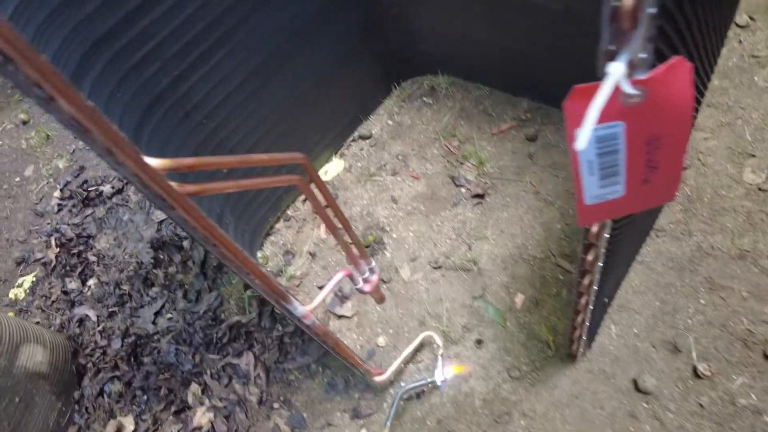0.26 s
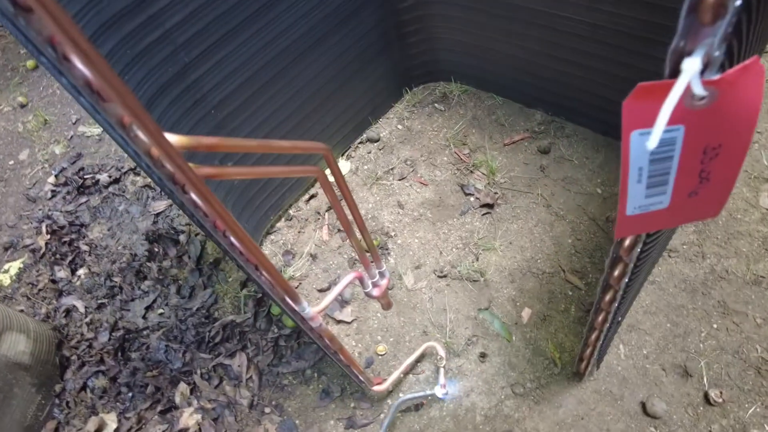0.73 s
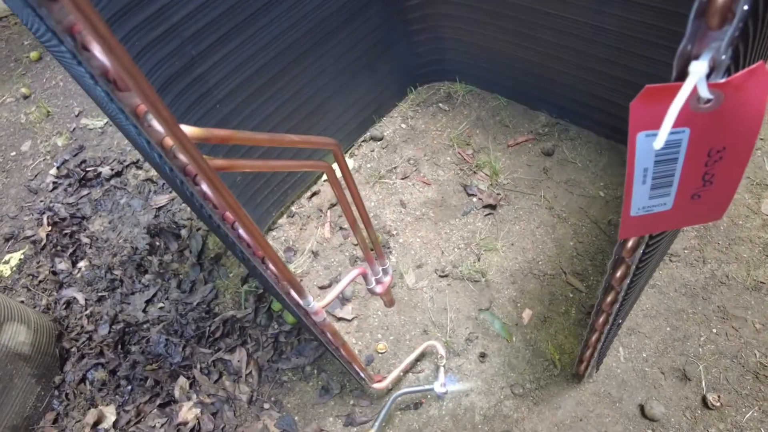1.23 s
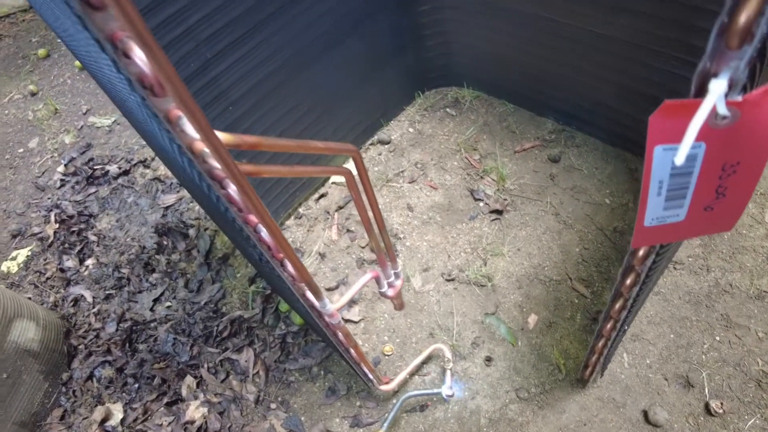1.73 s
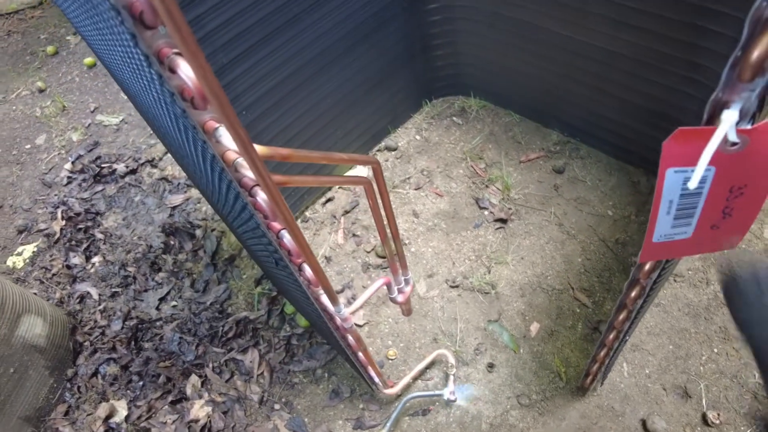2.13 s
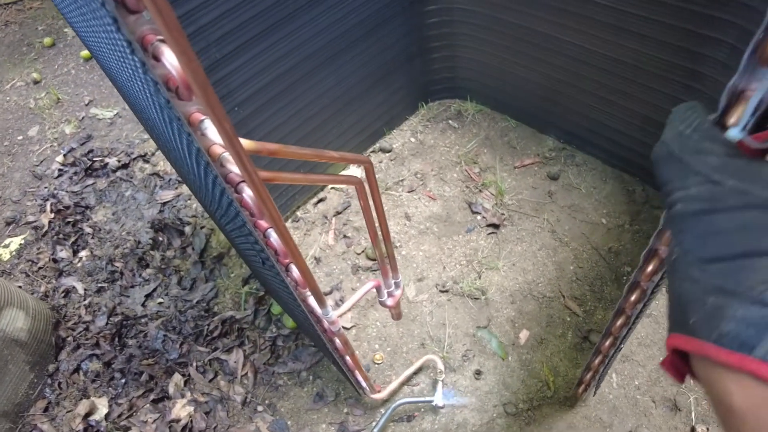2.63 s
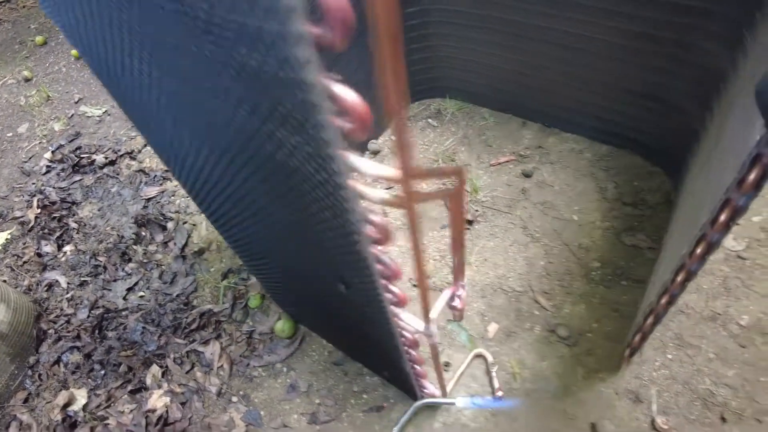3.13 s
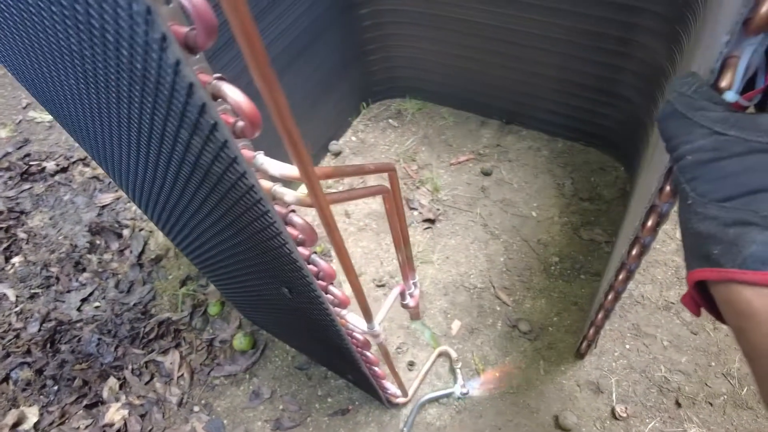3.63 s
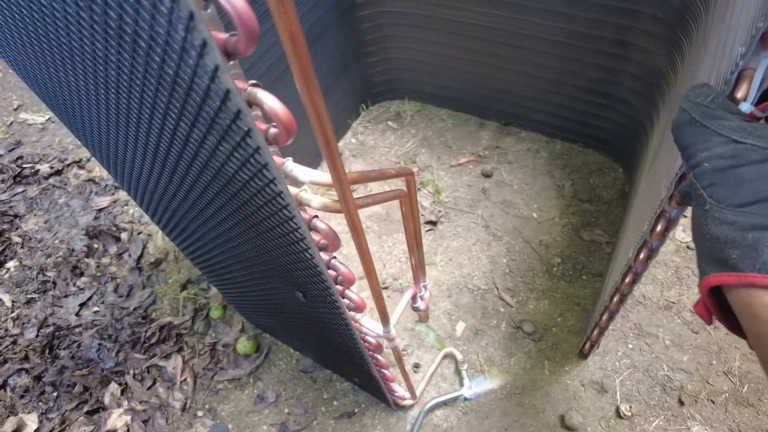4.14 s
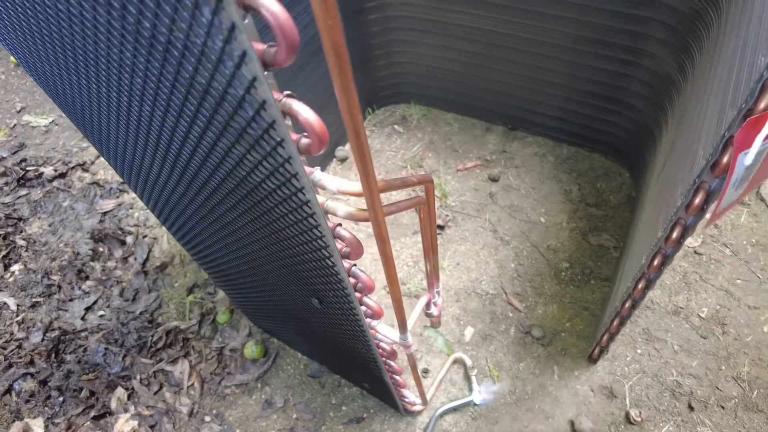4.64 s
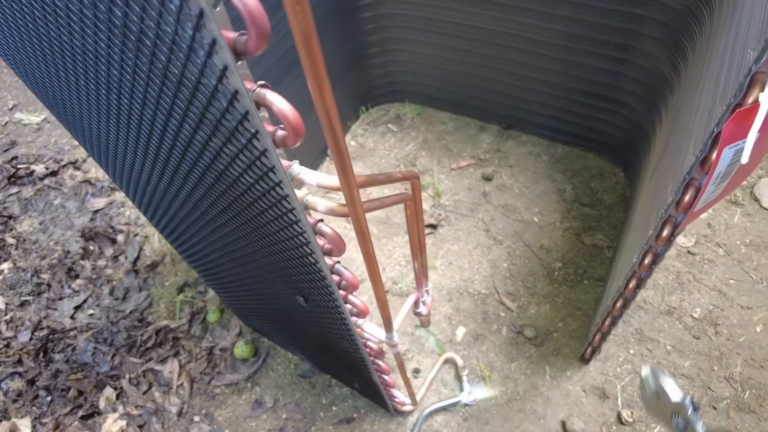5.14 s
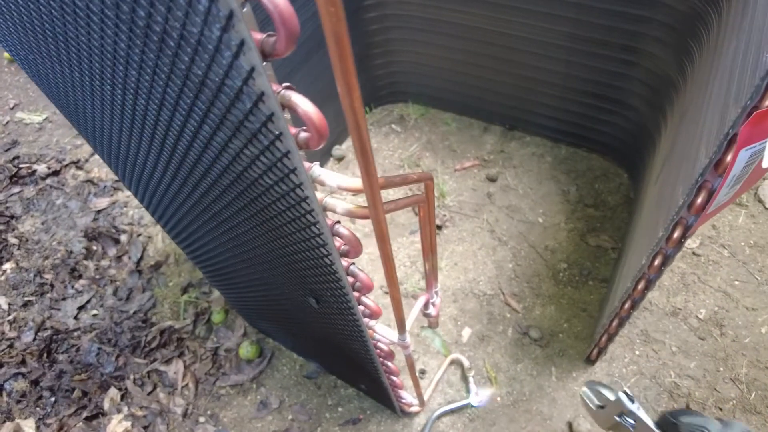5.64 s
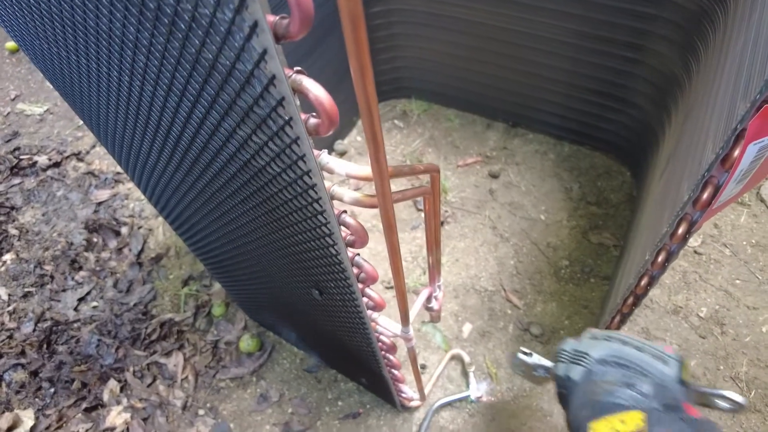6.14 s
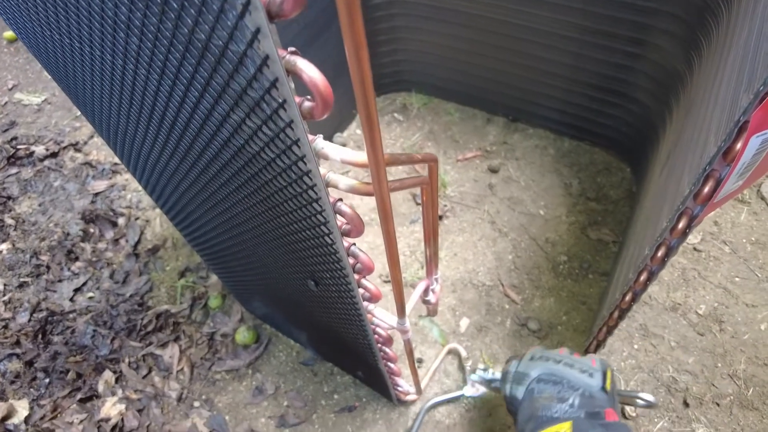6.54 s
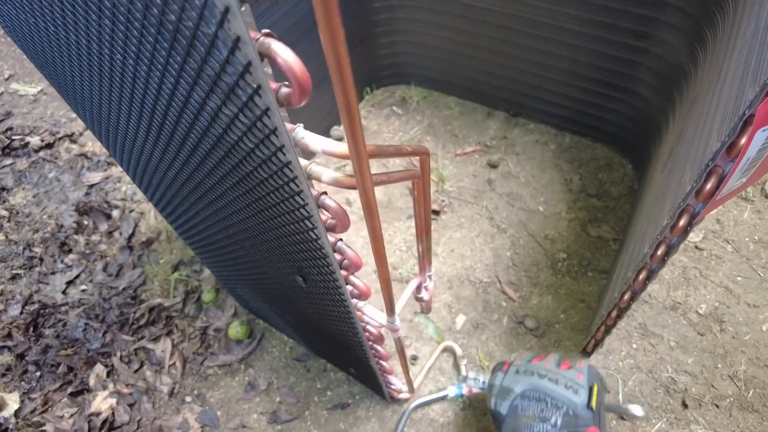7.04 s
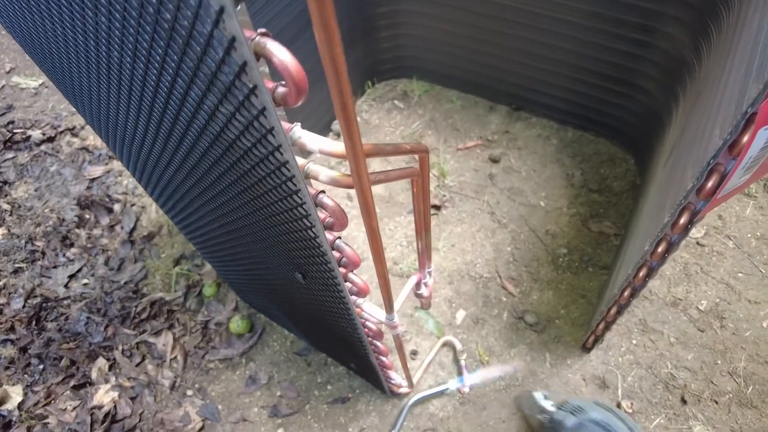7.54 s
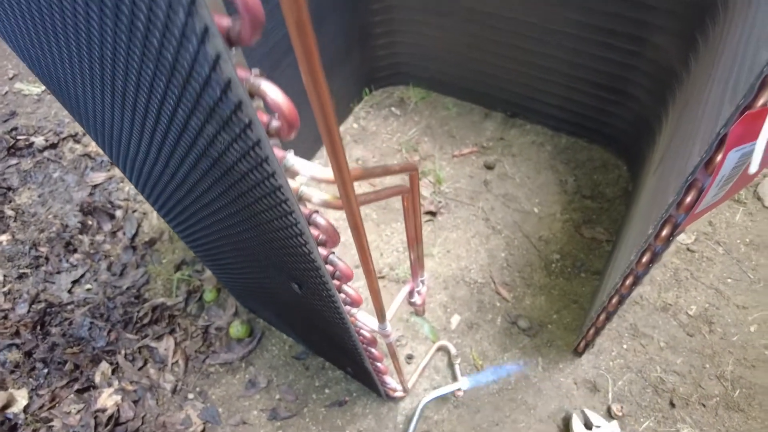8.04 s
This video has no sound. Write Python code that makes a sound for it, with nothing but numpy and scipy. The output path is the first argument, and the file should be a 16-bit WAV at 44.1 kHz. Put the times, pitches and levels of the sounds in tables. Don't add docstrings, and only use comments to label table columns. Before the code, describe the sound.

A handheld gas torch burns without pause very close to a chest-worn stereo microphone, over bare soil beside a metal coil. It starts with a fluttering roar and copper rasp; at about 0.1-0.35 s the flame brushes the soil with a gritty burst and two small pops, around 0.2 and 0.3. Bright hiss then dominates, with breathy, high pipe ringing strongest around 0.6-0.85, and a soft pop near 0.86. From 2.7 to 4 a deep flutter thickens the roar, while a gloved hand hollows the treble until about 3.2. The hiss surges near 3.3, then its color shifts as the wearer turns and the ringing grows fainter. It continues steadily with slow comb-like sweeps; the roar swells at 6.7-7.6. Near 8.0 a tiny plier click and pop coincide, followed by ringing gusts and stronger hiss until 8.3, without a fade.

```python
import sys
import numpy as np
from scipy import signal
from scipy.fft import rfft, irfft, next_fast_len
from scipy.io import wavfile
from scipy.ndimage import uniform_filter1d, map_coordinates

SR = 44100
rng = np.random.default_rng(int(sys.argv[2]) if len(sys.argv) > 2 else 0)


def amplitude_ratio(level_db):
    exponent = np.asarray(level_db, float) / 20
    return 10 ** exponent


def store_pcm(level_fs):
    pcm = np.round(np.clip(level_fs, -1, 1) * 32767).astype(np.int16)
    wavfile.write(sys.argv[1], SR, np.atleast_2d(pcm).T)


N = 365148
SIZE = next_fast_len(N)
HZ = np.arange(SIZE // 2 + 1) * SR / SIZE
T = np.arange(N) / SR

# t/s, jet level/dB, rasp on the copper level/dB
FLAME = [(0.0, -28, -30.5), (.45, -22.5, -33), (1.2, -23, -35.5), (1.9, -25, -31), (2.5, -23.5, -32.5),
         (2.68, -22.5, -33), (3.3, -20, -28), (3.45, -24, -30), (3.65, -24.5, -30.5), (3.9, -25.5, -30),
         (4.4, -24, -30), (5.3, -25, -29.5), (5.95, -21, -28.5), (6.15, -24, -31), (6.55, -27, -30.5),
         (7.25, -24.5, -32), (7.6, -22.5, -28.5), (8.28, -20.5, -31)]
# from t/s, to t/s, hiss gain/dB, further sizzle gain/dB
AIMS = [(-.05, .2, 5.5, 5.5), (.24, .3, 7, -12), (.3, .46, 0.7, 1.5), (.58, .84, 0.6, 5),
        (1.08, 1.17, 1.5, .1), (1.27, 1.62, 1, 3.5), (1.62, 1.95, -2.2, 8.5), (2.71, 2.96, 0.5, 4),
        (3.0, 3.21, 1, 1.5), (3.22, 3.42, 1, 1.5), (3.58, 3.72, -1.5, 0), (3.88, 4.3, 1, 6),
        (4.53, 4.76, -2, 9.5), (4.8, 5.06, -0.5, 8.5), (5.16, 6.03, -0.35, 7.5), (5.9, 6.04, 4, -11),
        (6.72, 7.0, 3, 2), (7.48, 7.8, -0.8, 6), (7.95, 8.04, 4, -19)]
# from t/s, to t/s, roar gain/dB, further deep flutter gain/dB
TEARS = [
    (-.05, .13, 1, 7),
    (.13, .36, 3.5, 3),
    (.83, .9, 3.5, 1),
    (.92, .99, 4, -2),
    (1.88, 2.25, 2.5, -7),
    (2.7, 4.0, 0.2, 11),
    (6.68, 7.6, 2, 6.5),
    (7.45, 8.06, 0.5, 7),
]
# f/Hz, level per Hz/dB
HISS = [(1800, -20.5), (2800, 2), (3600, 2.5), (5000, 1.5), (6500, 2.5), (7800, -11.5), (8600, -11),
        (10000, -13), (13000, -16.5), (16000, -33)]
RASP = [(800, -18), (1200, 2), (1500, 0.5), (2000, -2.5), (2500, -3.5), (3300, -2.5), (4500, -24.5)]
RUMBLE = [(20, -30), (40, -5), (70, -29.5), (200, -3.5), (330, 0), (500, 1.5), (650, 2), (850, 9),
          (1100, 6), (1500, -18.5)]
# f/Hz, share/0-1
LIKENESS = [(60, .985), (300, .97), (800, .91), (2000, .94), (4000, .92), (8000, .8), (15000, .45)]

# f/Hz, width/Hz, level/dB, left minus right/dB
STUBS = [(1915, 53, -25, -14), (4365, 184, 13.5, 5), (5795, 200, -1.5, 11), (6070, 200, -1.5, 19)]
# from t/s, to t/s, ring gain/dB, pitch shift/Hz
GUSTS = [(-.05, .11, -6, 5.5), (.17, .33, -6, 5), (.32, .45, 3.5, 60.5), (.612, .675, 13.5, 50.5),
         (.655, .84, 12.5, 69.5), (.82, 1.1, 0, 9.5), (1.05, 1.4, 5.5, -39.5), (1.33, 1.5, 2.5, -60.5),
         (1.49, 1.58, 7, -50.5), (1.7, 2.0, 6, -15), (2.22, 2.56, 1, 20), (2.7, 2.97, 9, -25),
         (2.98, 3.25, 9.5, -70), (3.17, 3.4, 3, -70), (3.72, 3.98, 11, 20), (4.0, 4.75, 5, 30),
         (4.16, 4.29, 4, -40.5), (4.8, 5.15, 4, -140), (5.25, 5.92, 5, 79), (5.9, 6.45, 4.5, 50.5),
         (6.72, 6.87, 6, -61.5), (7.82, 8.02, 11, -59), (8.085, 8.175, 15, -46), (8.21, 8.3, 4, -25)]
# from t/s, to t/s, first f/Hz, last f/Hz, width/Hz, level/dB
MOUTHS = [(-.05, .14, 4160, 4750, 200, -26), (.285, .326, 1850, 1750, 300, -26),
          (7.58, 7.75, 3500, 3400, 400, -30), (.4, 1.9, 1826, 1793, 90, -38.5),
          (2.2, 3.2, 1805, 1820, 90, -42), (4.85, 5.75, 3820, 3735, 230, -37.5),
          (6.3, 6.75, 4060, 3980, 170, -39), (7.05, 7.52, 3440, 3525, 230, -34),
          (.55, 1.95, 5800, 5770, 150, -37), (.5, 2.95, 6260, 6150, 230, -35),
          (8.13, 8.35, 3500, 3450, 350, -28), (7.48, 7.8, 5850, 5760, 200, -33)]

# t/s, lag/ms, share/0-1
SOIL = [(0.0, .17, 0.4), (.5, .24, .48), (1.4, .25, 0.41), (2.0, 0.21, 0.43), (2.65, .18, 0.24),
        (2.82, .26, 0.6), (3.25, 0.24, 0.62), (3.37, 0.19, 0.63), (3.46, 0.079, 0.54), (3.8, 0.074, 0.54),
        (4.05, 0.12, 0.39), (6.3, 0.11, 0.35), (7.05, 0.085, 0.48), (7.45, 0.1, 0.33), (7.66, .25, 0.58),
        (7.975, 0.23, 0.63), (8.2, 0.57, 0.48), (8.28, 0.63, 0.5)]
# from t/s, to t/s, lag lost/ms, share lost/0-1
SAGS = [
    (.6, 1.4, .055, .33),
    (3.02, 3.24, 0.04, 0),
    (7.68, 7.97, 0.053, 0.13),
]
# lag/ms, share, extra lag on the right/ms, wander/ms
WALLS = [(1.15, 0.099, 0.22, 0.097), (1.598, 0.049, -0.1, 0.033), (2.7, 0.063, 0.25, 0.11),
         (3.3, 0.11, -0.099, 0.13), (4.149, -0.19, -0.014, 0.0073), (6.9, 0.087, 0.012, 0.14)]
# t/s, lag/ms, share/0-1
CHEST = [(0, .46, .75), (.4, .5, .85), (.9, .565, .9), (1.4, .555, .88), (1.9, .49, .75), (2.1, .475, .68),
         (2.7, .465, .65), (3.1, .435, .7), (3.4, .425, .5), (4.3, .425, .55), (4.6, .455, .85),
         (5.9, .455, .85), (6.1, .45, .35), (7, .425, .6), (7.95, .425, .6), (8.1, .45, .8),
         (8.28, .46, .8)]
# f/Hz, level/dB
BENT = [(520, -23), (700, -15.5), (950, -7.5), (1200, -6.5), (1330, -22)]

# t/s, level/dB
SPLASH = [
    (0.12, -44),
    (0.142, -30.5),
    (0.194, -29),
    (0.2, -21.5),
    (0.296, -24),
    (0.306, -16),
    (0.35, -42),
]
# f/Hz, level per Hz/dB
SCUFF = [(250, -24), (400, -21), (780, 12.5), (1200, 4), (1900, 7), (3000, 14.5), (4500, -13), (7000, -42)]
# t/s, level/dB, f/Hz
POPS = [
    (.205, -17, 600),
    (.32, -16.5, 332),
    (0.861, -22.5, 370),
    (7.995, -22, 330),
]
# t/s, f/Hz, share/0-1
GLOVE = [
    (2.6, 5300, .1),
    (2.76, 5200, .75),
    (2.99, 5030, 0.9),
    (3.1, 6170, 0.7),
    (3.17, 7600, 0),
]
# f/Hz, level/dB, t60/s
PLIERS = [(6164, -11, 0.18), (10200, -3, .03), (11350, -3, .035), (14240, -2, 0.044), (15600, -3, .03)]

# f/Hz, left minus right/dB
BALANCE_DB = [(700, 1.5), (1300, 1), (2400, 3), (4400, 1), (8000, -2.6), (15000, 2.2)]
# f/Hz, width/Hz, left and right level/dB before the turn, the same after
PORTS = [(2030, 160, -2, 2.8, 2.5, 3), (2305, 72, 2, 0, 2, 2.5), (2580, 820, -1.4, 0.6, -2.5, -0.5),
         (3629, 850, 1.7, 0.2, 2.5, 2), (4140, 940, 3.5, 1, 3.5, -0.5), (5200, 290, -1, -11, 3.5, -2),
         (7480, 460, 7.5, -5.5, 8.5, 6), (8020, 200, -6, 10, 2, 5), (8660, 1640, 7, 3, 5.5, 1.5),
         (9340, 250, -3, 5, 2.5, 9.5), (10900, 1070, 1.5, 5.5, 7, 6.5), (11850, 1070, 1, 5, -4, 4.5),
         (13100, 1100, 3.5, 0, 4.5, 1), (15060, 1030, 10.5, 14, 13, 14)]


def curves(table):
    s, *columns = np.transpose(table)
    return [np.interp(T, s, c) for c in columns]


def span(start, end):
    return slice(max(int(start * SR) + 1, 0), min(int(end * SR), N))


def spells(table, roundness):
    out = np.zeros((len(table[0]) - 2, N))
    for start, end, *gains in table:
        on = span(start, end)
        swell = np.sin(np.pi * (T[on] - start) / (end - start)) ** roundness
        out[:, on] += np.outer(gains, swell)
    return out


def over_hz(points):
    hz, value = np.transpose(points)
    return np.interp(np.log(HZ + 1), np.log(hz), value)


def unit(x):
    return x / np.sqrt(np.mean(x ** 2))


def walk(rate):
    hold = int(SR / rate)
    steps = np.repeat(rng.standard_normal(N // hold + 1), hold)
    return 1.2 * uniform_filter1d(uniform_filter1d(steps, hold), hold)[:N]


def pair():
    alike = np.clip(over_hz(LIKENESS), 0, 1)
    mid, side = rfft(rng.standard_normal((2, SIZE)))
    mid, side = mid * np.sqrt(1 + alike), side * np.sqrt(1 - alike)
    return np.array([mid + side, mid - side])


def turbulence(points, per_octave, flicker_db, rate, shared_db):
    noise = pair() * amplitude_ratio(over_hz(points))
    together = shared_db * walk(rate)
    lo, hi = np.log2(points[0][0]), np.log2(points[-1][0])
    centres = np.linspace(lo, hi, int(per_octave * (hi - lo)) + 1)
    place = (np.clip(np.log2(HZ + 1), lo, hi) - lo) / (centres[1] - lo)
    out = 0
    for k in range(len(centres)):
        share = np.clip(1 - abs(place - k), 0, 1)
        band = irfft(noise * share, SIZE)[:, :N]
        out = out + amplitude_ratio(flicker_db * walk(rate) + together) * band
    return unit(out)


def dull(x, hz):
    return irfft(rfft(x, SIZE) / (1 + (HZ / hz) ** 4), SIZE)[:, :N]


def bell(hz, width):
    return 1j * HZ * width / (hz ** 2 - HZ ** 2 + 1j * HZ * width)


def resonance(x, from_hz, to_hz, width):
    def turn(hz):
        return np.exp(2j * np.pi * np.cumsum(np.broadcast_to(hz, x.shape[-1:])) / SR)

    keep = np.exp(-np.pi * width / SR)
    slow = signal.lfilter([(1 - keep) ** 2], [1, -2 * keep, keep ** 2], x / turn(from_hz))
    return 2 * (slow * turn(to_hz)).real


def late(x, ms, order=1):
    at = np.broadcast_to(np.arange(N) - ms * SR / 1000, x.shape)
    if order == 1:
        return np.array([np.interp(a, np.arange(N), side) for side, a in zip(x, at)])
    return np.array([map_coordinates(side, [a], order=order, mode="nearest") for side, a in zip(x, at)])


def jet():
    jet_db, _ = curves(FLAME)
    aim_db, beam_db = spells(AIMS, 0.27)
    hiss = turbulence(HISS, 2, flicker_db=1.4, rate=15, shared_db=.9)
    body = dull(hiss, 7700)
    sizzle = hiss - body
    return amplitude_ratio(jet_db + aim_db - 3.5) * (body + amplitude_ratio(beam_db - 2) * sizzle)


def rasp():
    _, rasp_db = curves(FLAME)
    return amplitude_ratio(rasp_db - 1.0) * turbulence(RASP, 1, flicker_db=.6, rate=14, shared_db=.3)


def roar():
    torn_db, flutter_db = spells(TEARS, 0.22)
    rumble = turbulence(RUMBLE, 1, flicker_db=.8, rate=9, shared_db=.4)
    deep = dull(rumble, 212)
    return amplitude_ratio(torn_db - 39.5) * (rumble + (amplitude_ratio(flutter_db - 2) - 1) * deep)


def ring():
    gust_db, gust_hz = spells(GUSTS, 0.81)
    noise, out = pair(), 0
    pitch = (4345 + gust_hz + 24.8 * walk(6)) / STUBS[1][0]
    bend = np.cumsum(pitch - 1) / SR
    for hz, width, db, pan_db in STUBS:
        mode = np.fft.ifft(noise * bell(hz, width) ** 2, SIZE)[:, :N]
        mode = mode * np.exp(2j * np.pi * hz * bend)
        side_db = np.array([[pan_db], [-pan_db]]) / 2
        out = out + amplitude_ratio(db + 1.6 * walk(25) + side_db) * unit(mode.real)
    ring_db = np.interp(T, (3.3, 3.42), (-28, -37.5))
    return amplitude_ratio(ring_db + gust_db - 3.5) * unit(out)


def mouths():
    noise, out = irfft(pair(), SIZE), np.zeros((2, N))
    for start, end, first_hz, last_hz, width, db in MOUTHS:
        on = span(start, end)
        passed = (T[on] - start) / (end - start)
        tone = resonance(noise[:, on], first_hz, first_hz + (last_hz - first_hz) * passed, width)
        out[:, on] += amplitude_ratio(db) * np.sin(np.pi * passed) ** .5 * unit(tone)
    return out


def soil_mirror(gas):
    soil_ms, soil_share = np.clip(curves(SOIL) - spells(SAGS, 2.2), 0, 1)
    return soil_share * late(dull(gas, 10000), soil_ms, order=3)


def wall_echoes(near):
    echoes = []
    for ms, share, right_ms, wander_ms in WALLS:
        lag_ms = ms + wander_ms * walk(0.784) + [[0], [right_ms]]
        echoes.append(share * late(near, lag_ms))
    return sum(echoes[:4]) + 0.96 * dull(sum(echoes[4:]), 2200)


def chest_echo(x):
    chest_ms, chest_share = curves(CHEST)
    skew_ms = [[-.022], [.022]]
    return np.clip(chest_share, 0, 1) * late(dull(x, 2600), chest_ms + skew_ms)


def bent_round_housing(x):
    inside = (HZ > BENT[0][0]) * (HZ < BENT[-1][0])
    quarter_turn = 1j * amplitude_ratio(over_hz(BENT)) * inside
    return irfft(rfft(x.mean(axis=0), SIZE) * quarter_turn, SIZE)[:N] * [[1], [-1]]


def soil_splash():
    brushing = (T > SPLASH[0][0]) & (T < SPLASH[-1][0])
    scuff = unit(irfft(pair() * amplitude_ratio(over_hz(SCUFF)), SIZE)[:, :N])
    return brushing * amplitude_ratio(curves(SPLASH)[0] + 0.5) * scuff


def pops():
    out = np.zeros(N)
    for s, db, hz in POPS:
        near = abs(T - s) < 1 / hz
        turn = (T[near] - s) * hz * 2 * np.pi
        out[near] -= amplitude_ratio(db) * 1.26 * turn * np.exp(-turn ** 2 / 2)
    return out


def gloved(x):
    on, out = span(GLOVE[0][0], GLOVE[-1][0]), x.copy()
    hz, share = np.array(curves(GLOVE))[:, on]
    out[:, on] -= np.clip(share, 0, 1) * resonance(x[:, on], hz, hz, width=960)
    return out


def pliers():
    age = np.clip(T - 7.994, 0, None)
    modes = [amplitude_ratio(db - 60 * age / t60) * np.sin(2 * np.pi * hz * age) for hz, db, t60 in PLIERS]
    return amplitude_ratio(-30) * sum(modes)


def scene():
    gas = jet() + rasp() + roar() + soil_splash()
    near = gas + soil_mirror(gas) + pops()
    around = near + wall_echoes(near)
    at_chest = gloved(around + chest_echo(around)) + bent_round_housing(around)
    return at_chest + ring() + mouths() + pliers()


def top_cut(x):
    return signal.sosfilt(signal.butter(12, 16660, fs=SR, output="sos"), x)


def record(dry):
    tilt = amplitude_ratio(over_hz(BALANCE_DB) * np.clip(HZ / 700, 0, 1) / 2)
    right_lag = np.exp(-2j * np.pi * HZ * .022 / 1000)
    heard = rfft(dry, SIZE) * (HZ < 15760) * [tilt, right_lag / tilt]
    colour = 1
    for hz, width, *db in PORTS:
        gain = amplitude_ratio(np.reshape(db, (2, 2, 1)))
        colour = colour * (1 + (gain - 1) * bell(hz, width))
    before, after = irfft(heard * colour, SIZE)[..., :N]
    turned = np.interp(T, (3.3, 4.0), (0, 1))
    mix = before + turned * (after - before)
    return top_cut(mix)


dry = scene()
out = record(dry)
store_pcm(out)
```